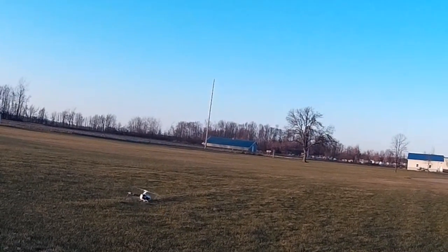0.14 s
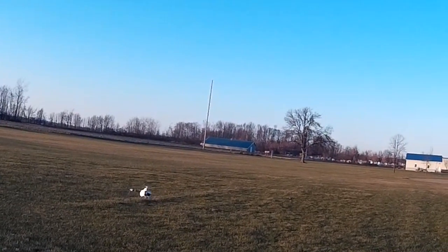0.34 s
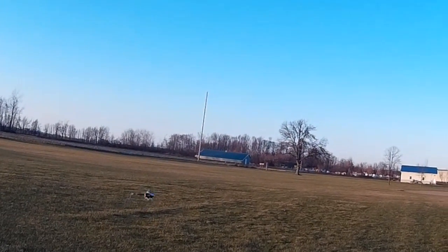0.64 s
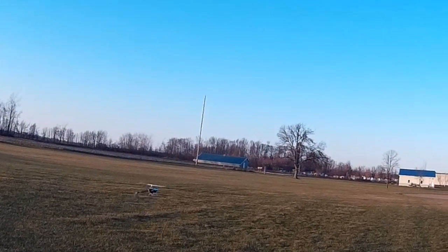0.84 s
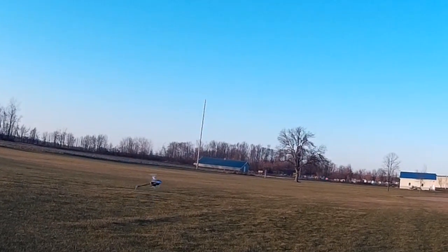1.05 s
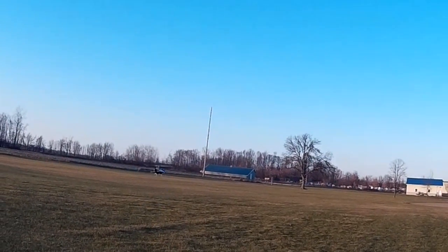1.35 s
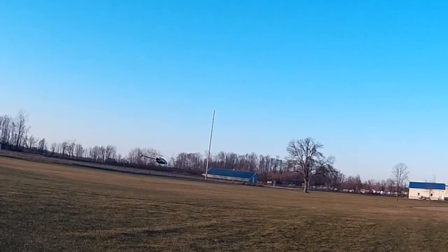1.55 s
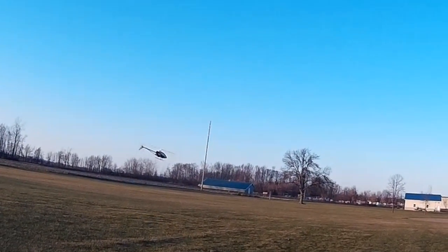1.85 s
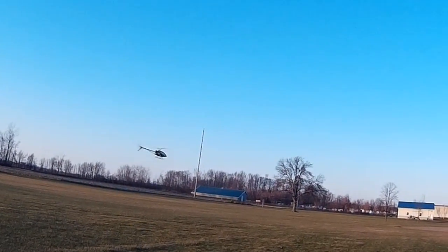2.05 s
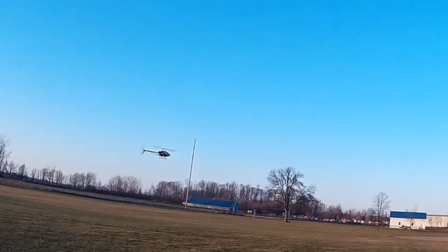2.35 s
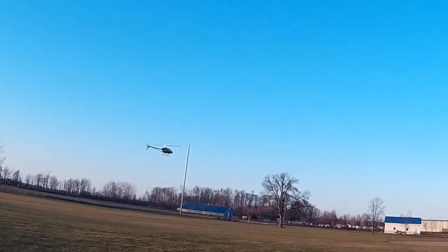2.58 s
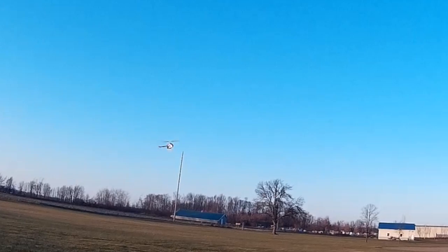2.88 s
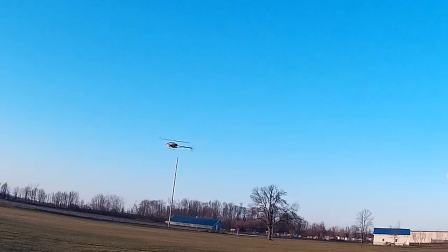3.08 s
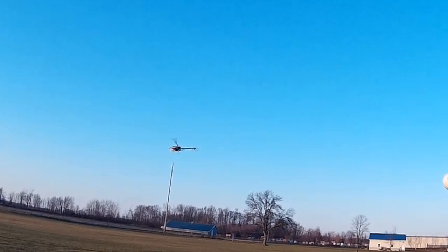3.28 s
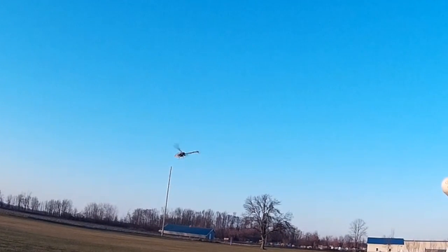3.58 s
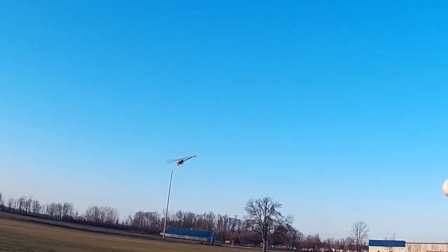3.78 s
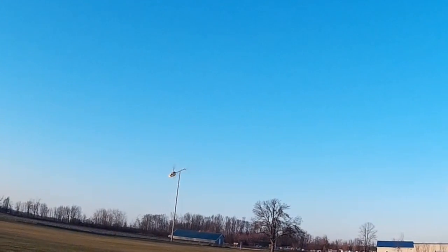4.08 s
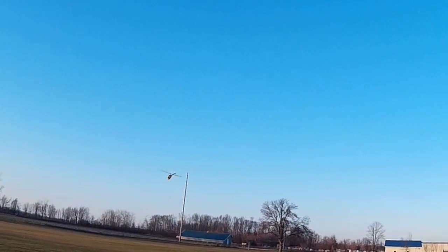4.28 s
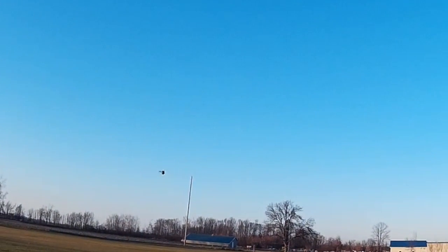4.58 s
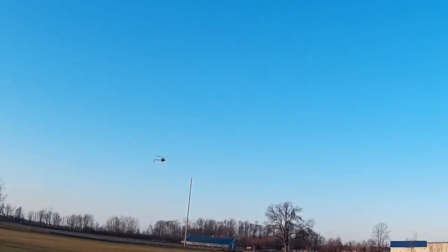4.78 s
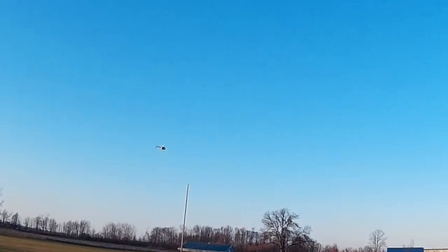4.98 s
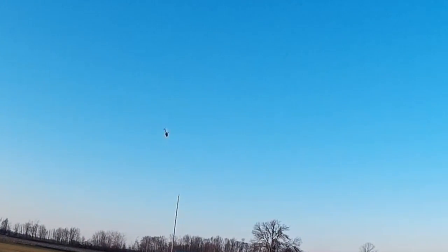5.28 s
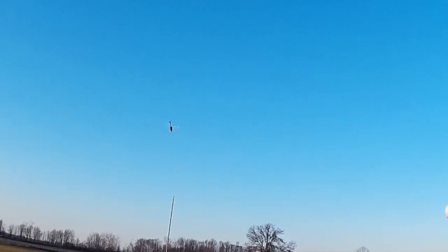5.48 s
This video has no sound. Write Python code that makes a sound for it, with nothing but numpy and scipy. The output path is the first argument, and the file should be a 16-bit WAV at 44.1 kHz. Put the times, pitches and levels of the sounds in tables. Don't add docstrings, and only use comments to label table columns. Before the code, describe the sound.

A small electric model helicopter, already at full speed, lifts off a grass field. A clear mid-pitched motor whine throbs rapidly over airy rotor wash and fine gear buzz. The whine nearly vanishes around two seconds, returns, then sags in pitch with a rough tail-blade growl near three seconds. It recovers, blades slap, and it climbs away. One distant handheld camera microphone in mono catches light wind rumble and thin electronic hiss.

```python
import sys
import numpy as np
from scipy import signal
from scipy.fft import rfft, irfft
from scipy.io import wavfile
from scipy.ndimage import uniform_filter1d

SR = 44100
rng = np.random.default_rng(int(sys.argv[2]) if len(sys.argv) > 2 else 0)


def field_ratio(decibels):
    return 10 ** (np.asarray(decibels, dtype=float) / 20)


def transcribe(signal):
    frames = np.atleast_2d(signal).T
    limited = np.clip(frames, -1, 1)
    pcm = np.round(limited * 32767).astype(np.int16)
    wavfile.write(sys.argv[1], SR, pcm)


N = 248267

PINION_ORDER, TAIL_ORDER = 12.5, 4.074
SIDE_COUNT = 5

# (time [s], level [dB])
GATE_CURVE = [(0.0, -73), (0.06, -72.5), (1.94, -72.5), (2.05, -82), (2.16, -81), (2.49, -79),
              (2.63, -71.5), (3.01, -72.5), (3.1, -79), (3.49, -74), (3.56, -71.5), (4.06, -72.5),
              (4.17, -80), (4.76, -82), (4.97, -81), (5.08, -77.5), (5.31, -73), (5.63, -72.5)]

SIDEBAND_PARTS = { "far": [(-52, .4, 0.01), (1.65, .3, -8), (2.75, .1, 3), (3.4, .4, -3), (4.15, .15, 5),
                  (4.75, .3, -9), (5.5, .2, -7)], "lower": [(-55.5, .5, 0.01), (.15, .3, -6),
                  (2.65, .4, -11), (3.05, .1, -6), (3.7, .5, -12), (4.3, .15, -4), (4.85, .3, -13)],
                  "upper": [(-54, .6, 0.01), (1.9, .3, -10), (3.03, .08, -8), (3.3, .15, 3), (3.72, .3, 6),
                  (4.7, .35, -10)], "lean": [(-3, 0.01, 0.01), (1.45, .25, 10), (2.45, .3, 5),
                  (3.0, .17, 12), (3.4, .12, 6), (4.05, .15, 8)]}
GUST_PARTS = { "gust": [(-59.5, .05, -1.1), (.47, .1, -5), (.66, .05, 8), (.85, .05, 8), (1.08, .12, 5),
              (1.75, .2, 5.5), (2.2, .25, 3), (2.65, .12, 5), (3.5, .15, 3)], "deep": [(-14, .05, 1.5),
              (2.15, .4, 11), (2.95, .4, 9), (5.4, .3, -8), (4.66, .05, 12), (4.97, .08, 9)]}


def columns(table):
    time_s, *rest = np.transpose(table)
    return [np.interp(np.arange(N) / SR, time_s, column) for column in rest]


def levels(parts):
    t = np.arange(0, N + 64, 64) / SR
    duck_db = np.interp(t, *np.transpose(GATE_CURVE)) + 72.5
    curves = []
    for (level_db, share, fade_db_s), *changes in parts.values():
        swell_db = sum(d * np.exp(-((t - s) / half_s) ** 2) for s, half_s, d in changes)
        level_db = level_db + share * duck_db + fade_db_s * t + swell_db
        curves.append(np.interp(np.arange(N) / SR, t, level_db))
    return curves


def walk(rate_hz):
    step = 32
    hold = int(SR / rate_hz / step)
    held = np.repeat(rng.standard_normal(N // step // hold + 2), hold)
    slewed = uniform_filter1d(uniform_filter1d(held, hold), hold)
    return 1.146 * np.repeat(slewed, step)[:N]


def tone(turns, order, db, flicker_db=1.5, rate_hz=9., drift_db=0.):
    cycles = order * turns + rng.random()
    wave = np.sin((2 * np.pi * (cycles - np.floor(cycles))).astype(np.float32))
    level_db = db + flicker_db * walk(rate_hz) + drift_db * walk(2.49)
    return np.sqrt(2) * field_ratio(level_db) * wave


def family(turns, harmonic, sides_db, flicker_db=1.5, drift_db=2.5, lean_db=0.):
    out = 0
    for k, db in enumerate(sides_db):
        offset = k - SIDE_COUNT
        side_db = db - np.sign(offset) * lean_db
        side_drift_db = drift_db if offset else 0
        out = out + tone(turns, harmonic * PINION_ORDER + offset, side_db, flicker_db, 15., side_drift_db)
    return out


def colour(points):
    hz = np.maximum(np.fft.rfftfreq(N, 1 / SR), 1)
    point_hz, point_db = np.transpose(points)
    return hz, field_ratio(np.interp(np.log(hz), np.log(point_hz), point_db))


def unit(x):
    return x / np.sqrt(np.mean(x ** 2))


def camera():
    pairs_db = [-3, -10.5, -16, -21]
    # (frequency [Hz], density [dB per Hz])
    hiss_colour = [(150, -4), (1500, 1), (3500, 2), (6000, -4), (10000, -1.5), (14400, -4.5)]
    whine_hz, step_hz = 9515.8, 72.64
    t = np.arange(N) / SR
    flips = 0
    for k, db in enumerate(pairs_db):
        flips = flips + (-1) ** k * 2 * field_ratio(db) * np.cos((2 * k + 1) * np.pi * step_hz * t)
    carrier = 2 * np.pi * whine_hz * t
    whine = flips * np.sin(carrier) + 0.24 * np.cos(carrier)
    hiss = unit(irfft(rfft(rng.standard_normal(N)) * colour(hiss_colour)[1], N))
    return field_ratio(columns(GATE_CURVE)[0]) * (np.sqrt(2) * field_ratio(1.5) * whine + field_ratio(5.0) * hiss)


def wind():
    # (frequency [Hz], density [dB per Hz])
    wind_colour = [(25, -11), (45, -3.5), (60, 0), (100, -3), (125, -3), (200, -10), (300, -11.5),
                   (600, -13), (2000, -31), (5000, -68)]
    hz, gain = colour(wind_colour)
    gust_db, deep_db = levels(GUST_PARTS)
    rumble = unit(irfft(rfft(rng.standard_normal(N)) * gain, N))
    deep_gain = np.exp(-((hz - 30.) / 23.0) ** 2)
    deep = unit(irfft(rfft(rng.standard_normal(N)) * deep_gain, N))
    return field_ratio(gust_db + 2. * walk(14.)) * (rumble + field_ratio(deep_db) * deep)


def ground(x):
    # (time [s], lag [ms])
    ground_lag = [(0, 0.95), (.5, 0.99), (1, 1.35), (1.4, 1.82), (2, 2.43), (2.7, 2.89), (3.25, 3.3),
                  (3.8, 3.05), (4.2, 2.71), (4.8, 2.68), (5.3, 3.45), (5.63, 3.7)]
    grass_gain, grass_hz = 0.44, 3200
    dull = signal.sosfilt(signal.butter(2, grass_hz, fs=SR, output="sos"), x)
    lag = columns(ground_lag)[0] * SR / 1000
    return x + grass_gain * np.interp(np.arange(N) - lag, np.arange(N), dull)


def air(turns):
    air_parts = { "wash": [(-56, .9, -.3), (.35, .35, 2), (1.5, .3, 2.5), (2.7, .12, 2.5), (3.09, .03, -6),
                 (3.13, .025, 11), (3.36, .06, 8), (3.54, .07, -7), (3.7, .1, 5), (4.0, .12, 3),
                 (4.3, .15, 4), (4.7, .3, -8), (5.4, .1, -4)], "rattle": [(-57, .8, -1.2), (1.3, .1, 4),
                 (1.9, .15, 3), (2.3, .3, 2), (2.68, .1, 3), (2.95, .04, 8), (3.06, .04, -4),
                 (3.13, .03, 7), (3.7, .15, 5), (4.0, .1, 3), (4.7, .35, -6)], "gear": [(-65.5, .8, -.9),
                 (1.35, .2, 2.5), (1.85, .3, 1.5), (2.75, .15, 3), (3.54, .08, 3), (4.6, .4, -2)],
                 "tip": [(-67.5, .7, -1.3), (1.8, .3, 4), (2.3, .3, 2), (3.09, .06, -5), (3.7, .15, 3),
                 (4.2, .15, -3)]}
    # (frequency [Hz], density [dB per Hz])
    air_colour = [(150, -6.5), (350, -7), (600, 4), (900, -1), (1300, -10.5), (1900, -6.5), (2400, -15.5),
                  (3000, -27), (3500, -32.5), (5000, -26.5), (9000, -33.5), (12000, -34.5), (13700, -41),
                  (14400, -39)]
    # (frequency [Hz], width [Hz], gain [dB])
    body_modes = [(753, 120, 8.5), (4250, 520, 8), (6410, 300, -7.5), (7180, 800, 11), (8200, 300, -3),
                  (8490, 240, 9.5), (10960, 820, 7.5), (12600, 370, 9)]
    bands_hz = [900, 1900, 4800, 11500]
    trims_db, depths = [4., 0.5, 0.94, 0.5], [0.19, 0.2, 0.098, 0.11]
    hz, gain = colour(air_colour)
    gain = gain * field_ratio(sum(db / (1 + (2 * (hz - f) / w) ** 2) for f, w, db in body_modes))
    teeth = rng.standard_normal(2048)
    repeat = np.interp(turns / 2 % 1, np.linspace(0, 1, len(teeth)), teeth)
    throb = np.cos(2 * np.pi * turns) + .5 * np.cos(4 * np.pi * turns + 0.89)
    source = rfft(rng.standard_normal(N) + 0.29 * repeat) * gain
    out = 0
    for k, (db, trim_db, depth) in enumerate(zip(levels(air_parts), trims_db, depths)):
        share = np.interp(np.log(hz), np.log(bands_hz), np.arange(len(bands_hz)) == k)
        level_db = db + trim_db + 0.68 * walk(10.0) + 0.87 * walk(5.)
        out = out + field_ratio(level_db) * (1 + depth * throb) * unit(irfft(source * share, N))
    return out


def rotors(turns):
    rotor_parts = { "hum": [(-60, 1.1, -.8), (.85, .2, 6), (1.85, .2, -18), (2.7, .1, -20), (2.95, .15, 6),
                   (3.3, .1, 8), (4.0, .08, 3), (4.2, .04, 10), (4.72, .25, 11), (5.12, .12, 8),
                   (5.63, .08, -22)], "octave": [(-54, .6, -1.2), (.3, .35, 5), (1.4, .08, -17),
                   (1.75, .15, 5), (2.97, .07, 8), (3.3, .1, -8), (3.7, .4, -14), (4.07, .06, 10),
                   (5.1, .1, -18), (5.35, .25, -13)], "slap": [(-63, 1.1, 0.01), (1.3, .2, -5),
                   (1.6, .08, -13), (1.8, .08, 5), (3.14, .05, -18), (3.3, .1, 13), (3.85, .3, 11),
                   (5.1, .08, 7), (5.4, .2, -9)]}
    slap_harmonics = [-17.5, -10, -15, -19, -7, -2, -10, -10, -10, -19, -9]
    hum_db, octave_db, slap_db = levels(rotor_parts)
    out = tone(turns, 2 * TAIL_ORDER, hum_db - 0.3, flicker_db=3.5, rate_hz=25.)
    out += tone(turns, 4 * TAIL_ORDER, octave_db - 3., flicker_db=3.5, rate_hz=38.0)
    slap = 0
    for k, db in enumerate(slap_harmonics):
        slap = slap + field_ratio(db + 2. * walk(9.)) * np.cos(4 * np.pi * (k + 2) * turns)
    blade_rate = tone(turns, 2, levels(GUST_PARTS)[0] - 9, flicker_db=3)
    return out + np.sqrt(2) * field_ratio(slap_db) * slap + blade_rate


def gears(turns):
    gear_parts = { "below": [(-90, 1.1, 0.01), (1.82, .33, 15), (2.3, .25, 11), (2.7, .2, 14),
                  (2.93, .08, 16), (3.04, .04, -10), (3.3, .25, 18), (3.85, .3, 15), (4.65, .1, 8)],
                  "mesh": [(-78, 1.2, -.8), (1.4, .3, -5), (1.95, .15, 6), (2.3, .2, 10), (2.66, .15, 9),
                  (2.97, .08, -10), (3.2, .15, -7), (3.55, .15, 12), (3.98, .15, 10), (4.65, .1, 9)],
                  "above": [(-80, 1.1, -.3), (.1, .15, 4), (1.7, .45, 13), (2.3, .2, 10), (2.75, .2, 14),
                  (3.04, .07, -15), (3.3, .15, 7), (3.8, .4, 13), (4.6, .2, 5)], "tail": [(-74, .7, -2.5),
                  (.8, .1, -8), (.55, .15, -4), (1.2, .22, 6), (1.9, .2, 4), (2.3, .2, 3), (2.74, .1, 10),
                  (4.05, .1, 7)]}
    sides_11 = [-16, -13, -15, -15, -11, -3, -8, -17, -19, -20, -20]
    sides_12 = [-20, -20, -18, -15, -9, -1, -11, -8, -11, -11, -7]
    sides_13 = [-11, -10, -11, -10, -8, -2, -8, -13, -14, -13, -7]
    below_db, mesh_db, above_db, tail_db = levels(gear_parts)
    out = field_ratio(below_db - 0.5) * family(turns, 11, sides_11, flicker_db=2.2)
    out += field_ratio(mesh_db + 1.5) * family(turns, 12, sides_12, flicker_db=3.5)
    out += field_ratio(above_db + 1.0) * family(turns, 13, sides_13, flicker_db=4.5)
    tail_orders = [22 * TAIL_ORDER, 23 * TAIL_ORDER, 8 * PINION_ORDER, 26 * TAIL_ORDER]
    for order, db in zip(tail_orders, [-3, -6, -5, -4]):
        out += tone(turns, order, tail_db + db, flicker_db=4.5, rate_hz=5.97)
    return out


def spin(turns):
    spin_harmonics = [-59, -51, -53, -59, -59, -62]
    centre_s, width_s, tail_order = 2.94, 0.083, 4.02
    bite = np.exp(-.5 * ((np.arange(N) / SR - centre_s) / width_s) ** 4)
    stack = 0
    for k, db in enumerate(spin_harmonics):
        stack = stack + tone(turns, 2 * tail_order * (k + 1), db, flicker_db=4.0, rate_hz=45.)
    chopped = tone(turns, 2 * tail_order + PINION_ORDER, -50.0, rate_hz=30.)
    return bite * (stack + chopped)


def motor(turns):
    overtone_parts = { "second": [(-54, .7, -1.2), (.65, .22, -8), (1.3, .3, 4.5), (1.87, .12, 4),
                      (2.62, .12, -3), (2.87, .1, 5), (3.14, .08, 8), (3.3, .08, -8), (4.3, .15, 1.5),
                      (5.0, .12, -4), (5.35, .15, 5)], "third": [(-57, 1.3, -1.1), (1.07, .12, -11),
                      (1.55, .13, -12), (2.65, .15, 5), (3.0, .08, -15), (3.15, .1, 6), (4.5, .35, -10)],
                      "fourth": [(-66, .7, -1.5), (.55, .13, -10), (.85, .15, 4), (1.4, .15, 4),
                      (2.72, .08, -7), (3.04, .06, -6), (3.28, .2, 12), (3.73, .3, 12.5)]}
    sides_1 = [-21.5, -19, -17, -14, -60, -60, -58, -4, -11.5, -12, -16.5]
    sides_2 = [-16, -18, -16, -10, -12, -6, -4, -16, -23, -24, -24]
    sides_3 = [-15.5, -16, -15.5, -15, -16, -3, -12, -20, -15, -18, -17]
    sides_4 = [-21, -22, -24, -20, -16, 1, -17, -22, -16, -24, -24]
    second_db, third_db, fourth_db = levels(overtone_parts)
    far_db, _, _, lean_db = levels(SIDEBAND_PARTS)
    out = field_ratio(far_db) * family(turns, 1, sides_1)
    out += field_ratio(second_db) * family(turns, 2, sides_2, drift_db=1.5, lean_db=lean_db)
    out += field_ratio(third_db) * family(turns, 3, sides_3)
    return out + field_ratio(fourth_db) * family(turns, 4, sides_4, flicker_db=1.8)


def unbalance(turns):
    # (time [s], level [dB])
    beam = [(0, -39.5), (1.05, -35), (1.55, -36), (1.9, -43.5), (2.1, -74), (2.3, -52), (2.5, -45),
            (2.62, -37.5), (2.84, -38), (2.97, -56), (3.3, -43), (3.68, -39), (4.02, -42.5), (4.35, -69),
            (4.66, -75), (4.85, -56), (5.26, -39.5), (5.63, -38)]
    tone_db = columns(beam)[0]
    lower_db, upper_db = levels(SIDEBAND_PARTS)[1:3]
    phase, turn = 2 * np.pi * PINION_ORDER * turns, 2 * np.pi * turns
    centre = field_ratio(tone_db + 0.55 * walk(12.)) * np.sin(phase)
    lower = field_ratio(lower_db + 1.2 * walk(5.)) * np.sin(phase - turn + 0.37 * walk(3.95))
    upper = field_ratio(upper_db + 1.5 * walk(5.)) * np.sin(phase + turn + 0.53 * walk(4.07))
    return np.sqrt(2) * (centre + lower + upper)


def shaft():
    # (time [s], speed [Hz])
    speed = [(0, 568.5), (.5, 569), (1.0, 568), (1.48, 567.5), (1.57, 562), (1.67, 568), (2.55, 571),
             (2.76, 567), (2.88, 552), (3.02, 521.5), (3.14, 535), (3.62, 563), (4.0, 564.5), (4.2, 559),
             (4.7, 560), (5.05, 568.5), (5.45, 570.5), (5.63, 578)]
    jitter = 1 + 0.000598 * walk(30.) + 0.002 * walk(7.)
    return np.cumsum(columns(speed)[0] * jitter) / SR / PINION_ORDER


def scene():
    turns = shaft()
    broad = ground(air(turns) + rotors(turns))
    tonal = gears(turns) + spin(turns) + motor(turns) + unbalance(turns)
    return (camera() + wind() + broad + tonal)[None]


def top_cut(x):
    return signal.sosfilt(signal.butter(12, 14440, fs=SR, output="sos"), x)


def record(dry):
    return top_cut(dry)


dry = scene()
out = record(dry)
transcribe(out)
```